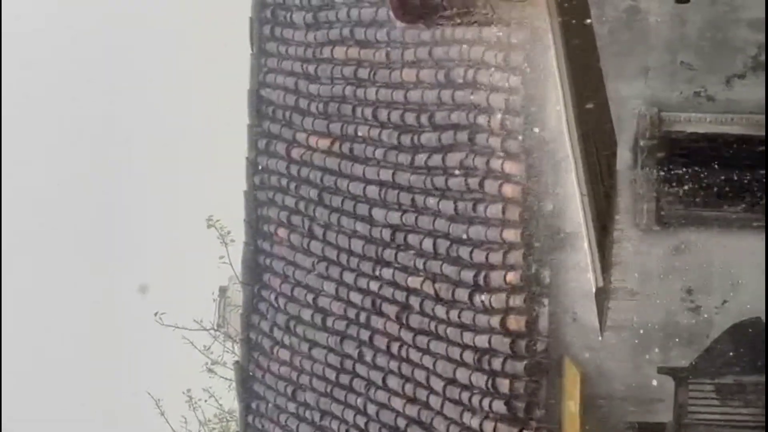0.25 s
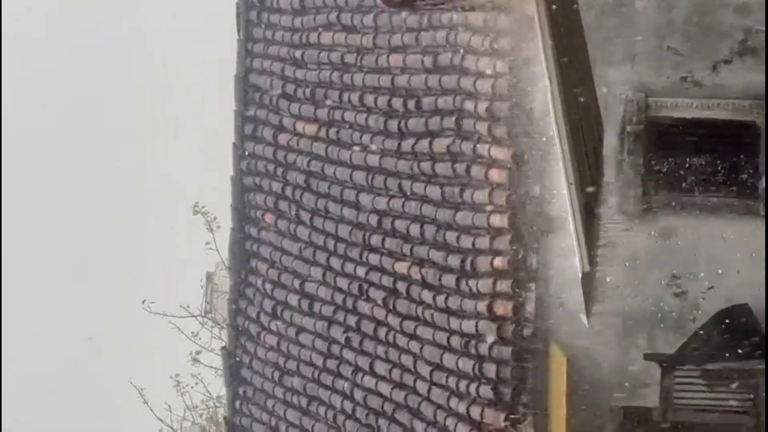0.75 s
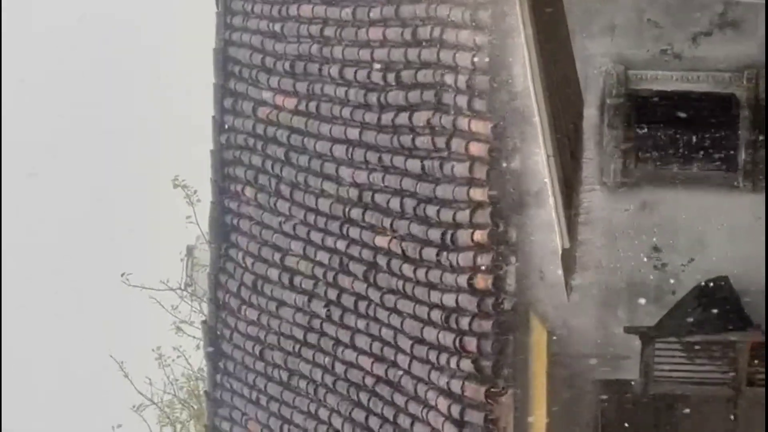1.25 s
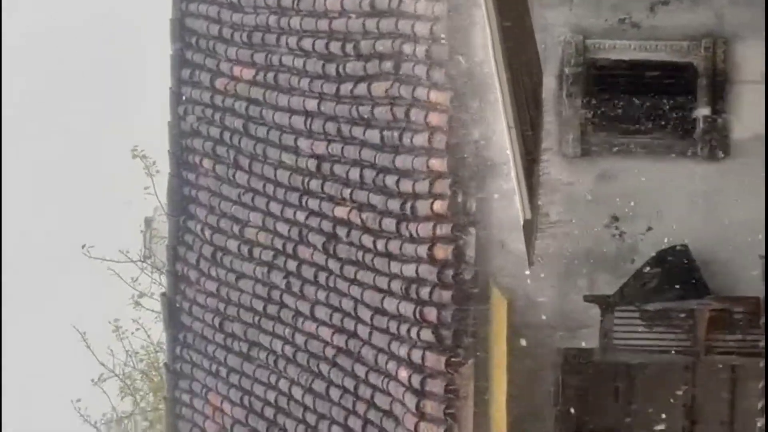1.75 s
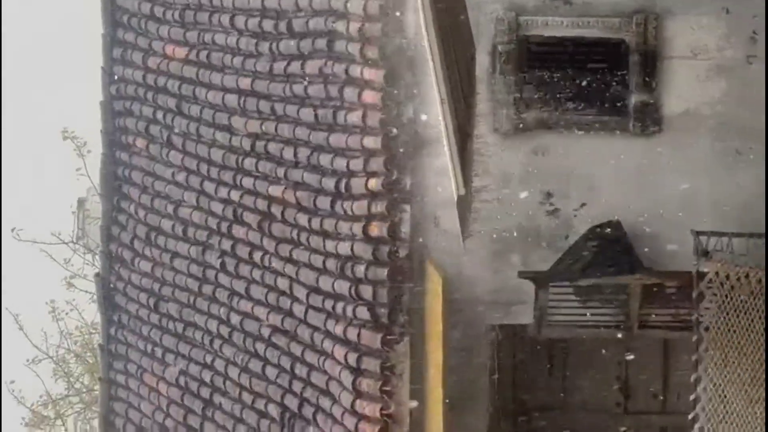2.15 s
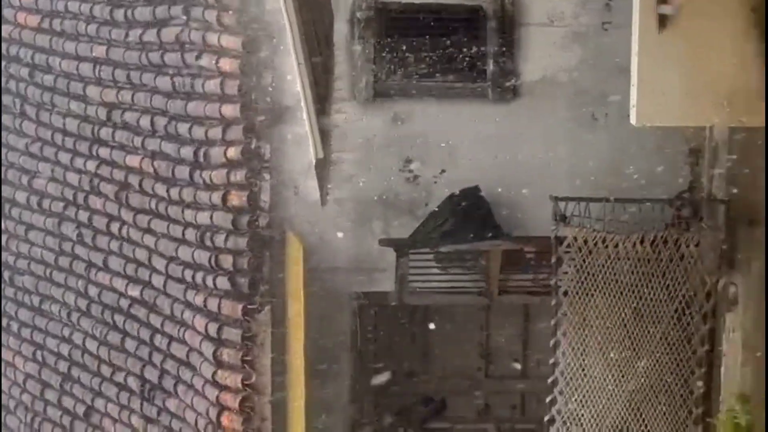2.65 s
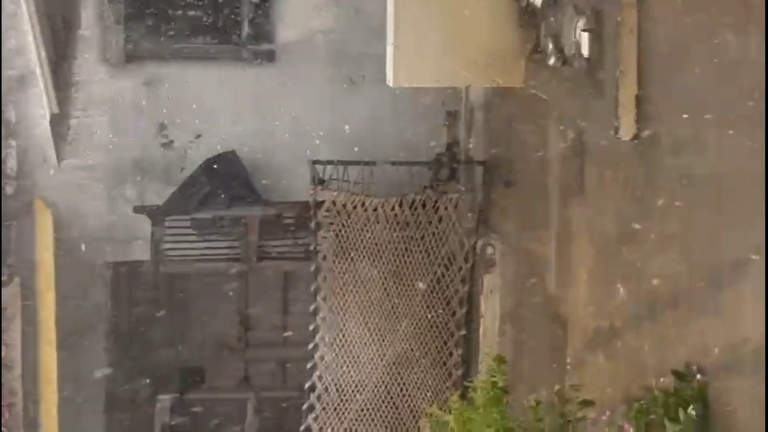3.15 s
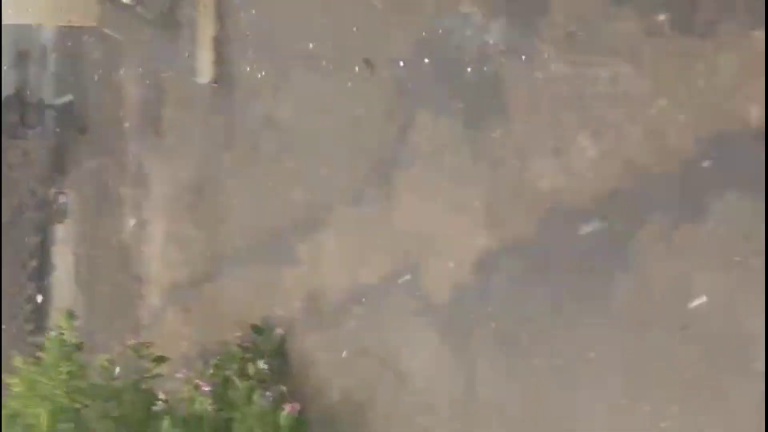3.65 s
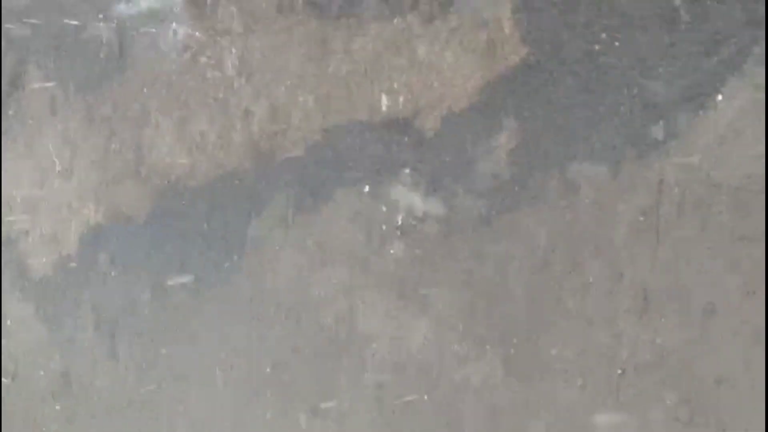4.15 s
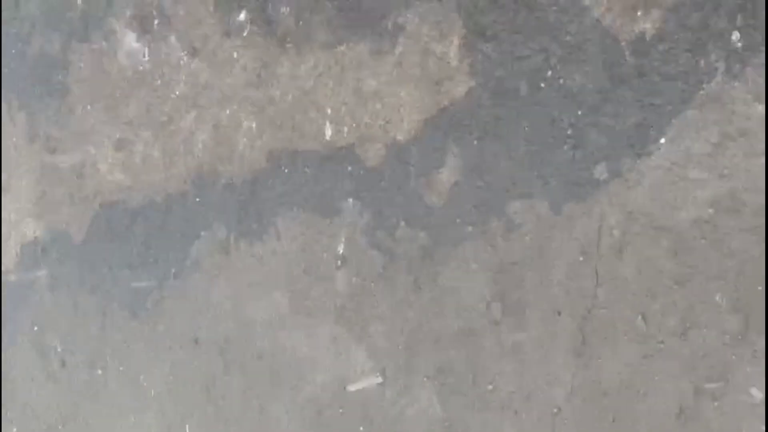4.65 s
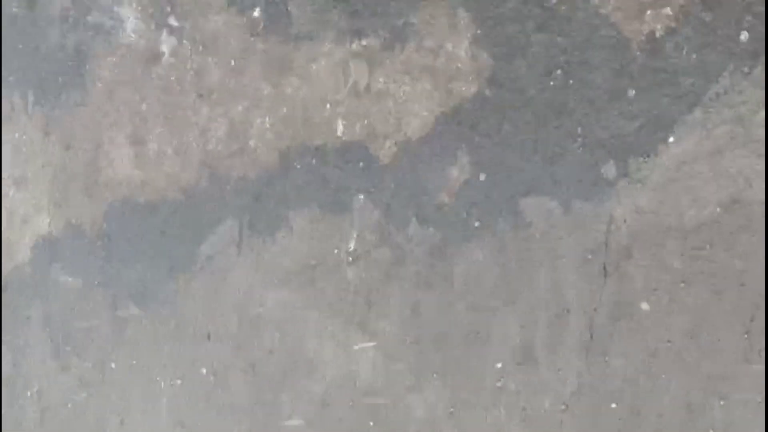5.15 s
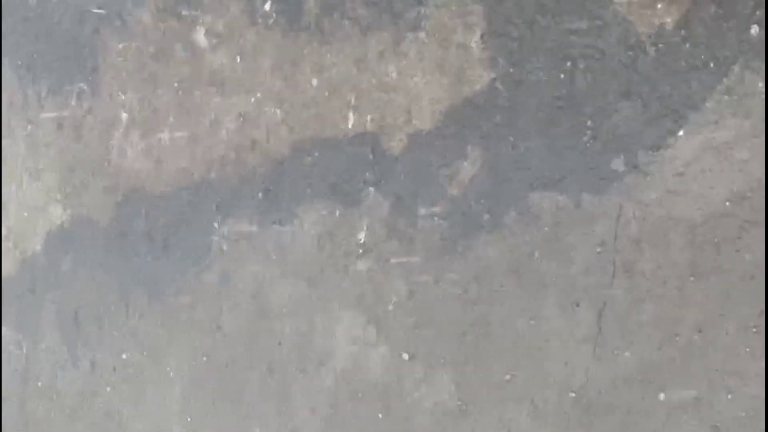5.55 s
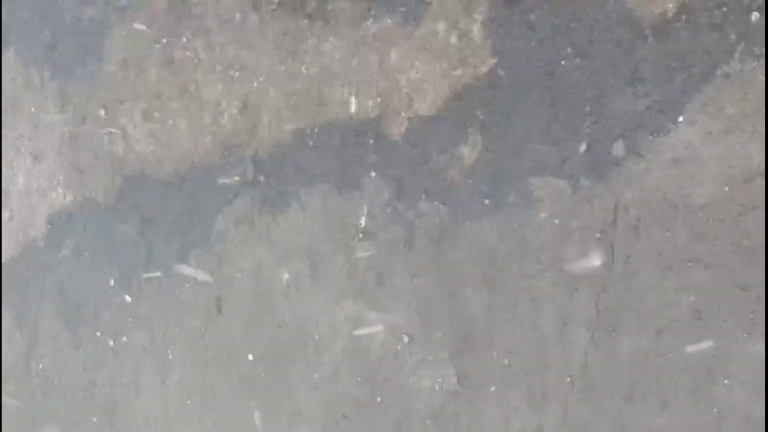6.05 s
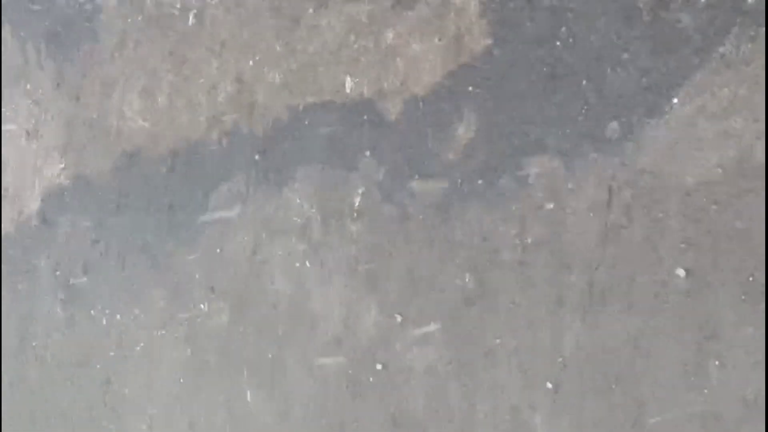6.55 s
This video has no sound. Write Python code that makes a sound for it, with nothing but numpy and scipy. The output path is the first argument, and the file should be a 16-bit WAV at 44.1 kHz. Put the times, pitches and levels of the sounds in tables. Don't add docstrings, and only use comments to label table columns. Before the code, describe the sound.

Heavy rain roars steadily on a tiled roof and paved yard, with sharp drop ticks, bright runoff splashes and dull thuds close by.

```python
import sys
import numpy as np
from scipy import signal
from scipy.fft import rfft, irfft, next_fast_len
from scipy.io import wavfile
from scipy.ndimage import uniform_filter1d, map_coordinates

SR = 44100
rng = np.random.default_rng(int(sys.argv[2]) if len(sys.argv) > 2 else 0)


def attenuation_scalar(level_db):
    decades = np.asarray(level_db, float) / 20
    return 10 ** decades


def store_wav(level_fs):
    pcm = np.round(np.clip(np.atleast_2d(level_fs), -1, 1) * 32767)
    wavfile.write(sys.argv[1], SR, pcm.T.astype(np.int16))


N = 299880


def unit(x):
    return x / np.sqrt(np.mean(x ** 2) + 1e-20)


def along(points, hz):
    f, v = np.transpose(points)
    return np.interp(np.log(hz + 1), np.log(f + 1), v)


def filtered(x, response):
    m = next_fast_len(x.shape[-1] + 2048)
    spectrum = rfft(x, m) * response(np.fft.rfftfreq(m, 1 / SR))
    return irfft(spectrum, m)[..., :x.shape[-1]]


def drops(count, hz, octaves, cycles, size_db):
    draw = rng.random((count, 2))
    pitch = np.clip(hz * 2 ** (octaves * rng.standard_normal((count, 1))), 150, 11000)
    size = attenuation_scalar(-size_db * np.log(draw[:, 1:] + 0.008))
    k = np.arange(128)
    turns = pitch * k / SR
    fade = np.exp(-turns / cycles) * np.cos(np.pi * k / 256)
    wave = size * np.sin(2 * np.pi * turns) * fade
    at = (draw[:, :1] * N).astype(int) + k
    return unit(np.bincount(at.ravel(), wave.ravel(), N + 128)[:N])


def yard(x, t60, wet):
    blocks = np.pad(x, (0, -N % 2048)).reshape(-1, 2048)
    t = np.arange(4097) / SR
    tails = rng.standard_normal((len(blocks), len(t))) * attenuation_scalar(-60 * t / t60)
    echo = signal.fftconvolve(blocks, tails / np.linalg.norm(tails[0]), axes=1)
    at = np.arange(len(blocks))[:, None] * 2048 + np.arange(echo.shape[1])
    return unit(x + wet * np.bincount(at.ravel(), echo.ravel())[:N])


def roar(spectrum, patchy_db, near):
    z = signal.stft(rng.standard_normal((2, N)), nperseg=256)[2]
    field = uniform_filter1d(rng.standard_normal(z.shape[1:]), size=9, axis=0)
    field = uniform_filter1d(field, size=14, axis=1)
    patchy = z * attenuation_scalar(patchy_db * unit(field))
    far = unit(signal.istft(patchy, nperseg=256)[1][:, :N])
    far[0] += near
    return unit(filtered(far, lambda hz: attenuation_scalar(along(spectrum, hz))))


def bursts(rows, rise, lump_s, lump_db, below_db, stops_db=0):
    out, t = np.zeros((2, N + SR)), np.arange(SR // 5) / SR
    pours_s, breaks_s = 0.027, 0.0044
    for s, db, hz, octaves, t60 in rows:
        noise = rng.standard_normal((2, len(t)))
        lumps = map_coordinates(rng.standard_normal(500), [np.minimum(t / lump_s, 490)])
        band = filtered(noise * attenuation_scalar(lump_db * lumps),
                        lambda f: np.exp(-.5 * (np.log2((f + 1) / hz) / octaves) ** 4))
        stop = stops_db * np.clip((t - pours_s) / breaks_s, 0, 1)
        decay = attenuation_scalar(-60 * (t / t60) ** 1.27 - stop) * (1 - t / t[-1])
        shape = (1 - np.exp(-t / rise)) * decay
        start = max(round((s - rise) * SR), 0)
        out[:, start:start + len(t)] += attenuation_scalar(db - below_db) * unit(band) * shape
    return out[:, :N]


# time in seconds, level in dB.
DOWNPOUR_STRENGTH = [(0.0, -24), (0.24, -25.5), (0.42, -25.5), (0.64, -26), (1.12, -26.5), (1.55, -27),
                     (1.86, -25), (2.01, -26.5), (2.67, -26), (2.86, -24.5), (3.6, -24.5), (3.81, -25.5),
                     (5.19, -23.5), (5.55, -23), (6.08, -24), (6.53, -23), (6.67, -23.5), (6.8, -25)]
# middle in seconds, change in dB, half length in seconds,
# surface it falls on (0 tiles, 1 paving, 2 air; values between or beyond reach them in part).
WIND_FLURRIES = [(0.024, 0, .05, 0), (0.218, 2.5, 0.026, 2.5), (0.553, -4, 0.081, 1), (1.01, 1, 0.22, 1),
                 (1.307, 5, 0.06, 1), (1.467, 0, .05, -1), (1.68, 1, 0.023, 0.7), (1.795, 6.5, 0.025, 3),
                 (1.957, 0, 0.053, 0), (2.171, 4.5, 0.025, 1.6), (2.27, 3, .05, 4), (2.365, 1, 0.021, 2),
                 (2.517, -2, 0.057, 0.8), (2.6, 5.5, 0.03, 1.3), (2.966, 0.5, 0.056, 3),
                 (3.215, 2, 0.014, -1), (3.404, 4.5, 0.018, 0.5), (3.54, 4.5, 0.051, 1),
                 (4.041, 7, 0.038, 1.3), (4.322, 1.5, 0.057, 1.2), (4.4, -3.5, 0.04, 1.5),
                 (4.852, 3, 0.12, 0.7), (5.195, 0.5, 0.078, 1), (5.235, 2.5, .03, 3), (6.166, -2, .03, -.5),
                 (1.45, 1.5, 0.028, 1.5), (1.62, 1, .03, -2), (2.16, 2, 0.023, -.5), (4.51, 2, .06, 0.5),
                 (5.11, -4, 0.13, -.5), (3.94, -2, .03, 0.5), (3.11, -1.5, .05, 0.6), (.82, -1.5, .03, 1.5),
                 (2.7, 2, .025, 0.5), (5.395, -0.5, 0.029, 0), (6.43, 1, .025, 0.5),
                 (6.585, -1.5, .015, 1.2), (.75, -1.5, .03, 3), (1.007, -1, .02, 2), (.67, -1, .02, 2),
                 (1.32, 2, 0.031, 1.5), (6.346, 2, .035, 2), (4.5, 1.5, .06, 2), (.6, -2, 0.069, 0),
                 (5.33, -1, 0.075, 0), (5.65, -1.5, .02, 1), (4.047, -4.5, 0.014, 3),
                 (1.277, 0.5, 0.023, 6), (5.57, 2, 0.029, -8), (5.734, 1.5, 0.036, 1),
                 (5.938, -2, 0.021, 2), (6.22, -1.5, 0.085, 0.64), (6.395, 7.5, 0.041, 3),
                 (6.51, 3, 0.071, 1), (6.608, 3.5, 0.019, 1.3)]
# level in dB at mean rain, change in dB per dB of rain.
LAYER_RESPONSE = [
    (-36.5, 1),
    (-33.5, 0.78),
    (-26, 0.91),
]
# frequency in Hz, level in dB.
TILE_TONE = [(18, -46), (30, -13), (112, 0), (232, -0.5), (581, 1), (750, -4.5), (980, -32), (1650, -120)]
# frequency in Hz, level in dB.
PAVING_TONE = [(410, -21), (700, -2), (914, -1), (2180, 2), (2500, -3.5), (3250, 0.5), (5500, -120)]
# frequency in Hz, level in dB.
SPRAY_TONE = [(1900, -35.5), (2400, -2), (3000, -2), (4200, 0), (5600, 0.5), (7600, 3), (8600, 2.5),
              (9400, 0), (10000, 0.5), (10700, -5.5), (11500, -16), (12100, -71)]


def downpour():
    t, surface = np.arange(N) / SR, np.arange(3)[:, None]
    strength = np.interp(t, *np.transpose(DOWNPOUR_STRENGTH))
    even_db, follows = np.transpose(LAYER_RESPONSE)[..., None]
    gusts_db = np.zeros((3, N))
    for s, db, half, on in WIND_FLURRIES:
        gusts_db += db * np.exp(-(surface - on) ** 2) * np.exp(-((t - s) / half) ** 2)
    knots = rng.standard_normal(200)
    gusts_db += 0.35 * map_coordinates(knots, [t * 9])
    gusts_db += 0.45 * map_coordinates(knots[::-1], [t * 18])
    tiles_gain, paving_gain, spray_gain = attenuation_scalar(even_db + follows * (strength - strength.mean()) + gusts_db)

    on_tiles = yard(drops(count=2500, hz=486, octaves=0.7, cycles=4.3, size_db=0.0), t60=0.41, wet=1.15)
    on_paving = yard(drops(count=4000, hz=1706, octaves=0.63, cycles=1.7, size_db=2.5), t60=0.24, wet=1.44)
    droplets = yard(drops(count=8000, hz=5000, octaves=0.7, cycles=1.23, size_db=2.5), t60=0.11, wet=1.0)
    tiles = roar(TILE_TONE, patchy_db=-1.36, near=0.19 * on_tiles)
    paving = roar(PAVING_TONE, patchy_db=0.7, near=0.32 * on_paving)
    spray = roar(SPRAY_TONE, patchy_db=1.5, near=0.62 * droplets)
    return tiles_gain * tiles + paving_gain * paving + spray_gain * spray


# time in seconds, peak in dB, pitch in Hz.
DOORSTEP_DROPS = [(1.539, -14, 6000), (0.5777, -16, 1700), (0.9845, -16, 4400), (1.0892, -20, 1980),
                  (1.1327, -7, 4700), (1.3803, -13, 1980), (1.4604, -20, 4200), (1.5225, -19, 1800),
                  (1.5911, -19, 1950), (1.6158, -18, 8000), (1.8522, -12, 3400), (1.9072, -7, 4050),
                  (1.9126, -13, 4800), (2.0054, -16, 4870), (2.2752, -9, 7500), (2.309, -5, 5200),
                  (2.5047, -20, 7400), (2.569, -18, 1400), (2.5954, -9, 4070), (2.606, -16, 3450),
                  (2.802, -13, 7800), (3.0066, -13, 4100), (3.2629, -14, 8300), (3.297, -18, 1620),
                  (3.3505, -14, 4400), (3.634, -19, 1190), (3.707, -22, 1140), (3.7361, -13, 5600),
                  (4.158, -18, 2620), (4.264, -9, 3700), (4.429, -23, 1400), (2.722, -11, 4000),
                  (4.5795, -15, 1800), (5.893, -14, 4000), (4.7008, -12, 2330), (4.7212, -10, 2460),
                  (4.7593, -10, 1800), (4.8744, -16, 3100), (4.9137, -14, 6100), (5.0197, -12, 2380),
                  (5.129, -19, 6400), (5.2078, -11, 7460), (5.392, -10, 7500), (5.4902, -6, 4300),
                  (5.4932, -17, 3800), (5.553, -21, 2600), (5.7788, -16, 2300), (5.8914, -11, 1460),
                  (5.9132, -16, 8200), (5.9615, -15, 1300), (5.9897, -7, 3900), (6.0027, -23, 1460),
                  (6.0178, -16, 1340), (6.1022, -10, 3800), (6.1237, -7.5, 4100), (6.3091, -11, 7800),
                  (6.3539, -8, 6400), (6.541, -20, 1480), (6.6056, -6.5, 4500), (6.612, -8.5, 5860)]


def doorstep():
    out, t = np.zeros((2, N + SR)), np.arange(SR // 100) / SR
    rise_cycles, frame_s, frame_db = 0.4, 0.0036, -12
    for s, db, hz in DOORSTEP_DROPS:
        age, start = hz * t / rise_cycles, s - rise_cycles / hz
        wave = np.cos(2 * np.pi * (hz * t - rise_cycles)) * rng.choice([-1, 1])
        click = attenuation_scalar(db) * wave * age * np.exp(1 - age)
        out[0, round(start * SR):][:len(t)] += click
        out[0, round((start + frame_s) * SR):][:len(t)] += attenuation_scalar(frame_db) * click
    small = drops(count=700, hz=1900, octaves=0.68, cycles=0.29, size_db=1.5)
    small = filtered(small, lambda f: f / (f + 300))
    out[0, :N] += attenuation_scalar(-45) * yard(small, t60=0.035, wet=0.74)
    return out[:, :N]


# time in seconds, peak in dB, pitch in Hz, width in octaves.
ROOF_LUMPS = [(.048, -16, 540, 0.35), (.19, -21, 477, 0.49), (1.266, -14, 563, 0.41),
              (1.32, -14, 466, 0.35), (1.39, -13.5, 435, 0.97), (2.2, -16, 440, 0.29),
              (2.565, -14.5, 395, 0.074), (1.66, -14.5, 505, 0.56), (1.81, -19, 810, 0.2),
              (5.7, -17, 626, 0.11), (3.36, -26, 540, 0.27), (3.43, -19.5, 560, 0.25), (4.38, -23, 420, .4),
              (4.47, -19, 540, .4), (2.3, -19, 330, 0.42), (2.977, -15.5, 660, 0.087),
              (3.481, -16.5, 284, 0.4), (3.561, -12.5, 355, 0.82), (4.084, -14, 504, 0.75),
              (4.287, -19, 595, 0.49), (4.897, -20, 613, 0.53), (5.061, -19, 528, 0.55),
              (5.131, -20, 624, 0.23), (5.626, -20, 598, 0.11), (5.873, -18, 554, 0.35),
              (6.51, -17, 377, 0.65), (6.6, -11.5, 171, 0.2)]


def roof_drum():
    rows = [(*row, 0.32) for row in ROOF_LUMPS]
    return bursts(rows, rise=0.00979, lump_s=0.013, lump_db=0, below_db=15)


# time in seconds, peak in dB, centre in Hz.
RUNOFF_SPLASHES = [(0.5385, -16, 8200), (0.9798, -26, 4430), (1.2342, -15, 3560), (1.2784, -22, 3200),
                   (1.536, -19.5, 8440), (1.6134, -16.5, 8080), (1.671, -17.5, 2860), (2.4984, -22.5, 7370),
                   (2.5916, -15.5, 4430), (2.9722, -19, 6660), (3.0024, -22, 2860), (3.2595, -14.5, 7400),
                   (3.3494, -18.5, 4290), (3.7264, -20.5, 3040), (4.0444, -11.5, 5960),
                   (4.2303, -14.5, 5900), (4.4466, -14, 8000), (4.7574, -14, 4530), (5.2084, -21, 5590),
                   (5.3914, -15, 3650), (5.4878, -16, 3700), (5.7257, -17, 4700), (5.826, -18, 6730),
                   (5.9247, -11.5, 6860), (5.9882, -22, 2940), (6.0195, -19, 7600), (6.4724, -15, 3200),
                   (6.5318, -18, 6700)]
# time in seconds, peak in dB, centre in Hz, width in octaves, time to die by 60 dB in seconds.
HEAVY_GUSHES = [(.179, -8, 4560, 0.14, 0.3), (0.184, -8.5, 5600, 0.8, 0.2), (1.13, -7.5, 5700, 0.6, 0.22),
                (1.236, -15.5, 2200, 1.2, 0.6), (1.743, -12, 7000, 0.69, 0.32),
                (1.78, -9.5, 7840, 0.34, 0.16), (1.903, -6.5, 5770, 0.87, 0.2),
                (2.168, -10, 6250, 0.68, 0.55), (2.2739, -7.5, 8100, 0.72, 0.15),
                (2.307, -3, 6000, 0.65, 0.28), (2.718, -9.5, 4160, 0.49, 0.12),
                (2.74, -16.5, 2630, 0.99, .25), (2.168, -15, 4400, 0.13, 0.36),
                (2.353, -16, 6960, 0.33, .2), (2.8, -9.5, 7730, 0.32, 0.11),
                (3.112, -11.5, 7440, 0.35, 0.076), (3.512, -9.5, 6300, .7, .3),
                (3.524, -4, 6400, 0.78, 0.14), (4.6832, -10.5, 6200, 0.78, 0.2),
                (4.852, -11.5, 7030, .5, 0.24), (5.575, -12.5, 4950, 0.59, 0.13),
                (5.669, -11, 5000, .6, .2), (6.306, -9.5, 7100, 0.6, 0.3), (6.348, -7, 6000, 0.79, 0.21),
                (6.377, -15, 4000, 0.78, 0.2), (6.605, -10, 3100, 0.42, 0.2),
                (6.605, -7.5, 5800, 0.33, 0.2)]


def runoff():
    rows = []
    for s, db, hz in RUNOFF_SPLASHES:
        t60 = 0.21 * 0.69 ** np.log2(hz / 5000)
        rows.append((s, db, hz, 0.41, t60))
    return bursts(rows + HEAVY_GUSHES, rise=.0016, lump_s=0.0019, lump_db=1.0, below_db=11.5, stops_db=2.5)


# time in seconds, peak in dB, pitch in Hz.
HEAVY_DROPS = [(.575, -12, 1640), (1.238, -9, 2290), (1.279, -19, 2080), (1.325, -17, 1400),
               (1.379, -15, 1960), (2.565, -14, 1520), (2.719, -10, 920), (2.749, -14, 2440),
               (2.799, -15, 1010), (3.294, -19, 1620), (3.386, -11, 1790), (3.48, -9, 2000),
               (3.529, -12, 860), (3.825, -11, 2310), (4.157, -9, 706), (4.447, -12, 1360),
               (4.7, -11, 1810), (4.758, -16, 1730), (5.017, -17, 1480), (5.35, -19, 1680),
               (5.552, -12.5, 1690), (5.676, -7.5, 2470), (5.892, -9.5, 1400), (5.96, -7.5, 1330),
               (6.016, -11, 1350), (6.374, -19.5, 2380), (6.471, -5, 1230), (6.491, -8, 1500),
               (6.713, -26, 1510), (6.764, -10.5, 2470)]


def thuds():
    rows = [(*row, 0.34, 0.12) for row in HEAVY_DROPS]
    return bursts(rows, rise=.004, lump_s=.004, lump_db=4.0, below_db=18.5)


# time in seconds, peak in dB, centre in Hz.
EAVES_SPATTER = [(1.127, -13, 5000), (1.24, -21, 1350), (1.256, -23, 2700), (1.28, -18, 4200),
                 (1.325, -23, 3300), (1.955, -18, 2660), (1.295, -19, 7150), (1.725, -15.5, 7640),
                 (1.788, -24, 950), (1.92, -24, 4870), (2.736, -28, 1350), (2.794, -16, 3700),
                 (3.275, -17.5, 2900), (3.37, -22, 1400), (3.47, -23, 950), (3.483, -23, 1900),
                 (3.575, -26, 1900), (3.583, -17.5, 5400), (3.748, -21, 955), (3.838, -20, 5400),
                 (4.02, -21.5, 3600), (4.25, -25, 940), (4.256, -15, 5200), (4.612, -27, 950),
                 (4.878, -15, 3800), (5.115, -19, 2700), (5.136, -20, 1350), (5.172, -15, 7600),
                 (5.422, -17, 3100), (5.558, -14, 5220), (5.592, -15, 5940), (5.62, -31, 670),
                 (5.675, -16, 3900), (5.725, -21, 4900), (5.722, -23, 1950), (5.777, -20, 3800),
                 (5.785, -24, 680), (5.826, -20, 2710), (5.905, -28, 500), (6.082, -15, 2300),
                 (6.325, -21, 3800), (6.54, -22, 690), (6.618, -22, 675)]


def eaves():
    rows = [(*row, 0.27, 0.12) for row in EAVES_SPATTER]
    return bursts(rows, rise=.003, lump_s=0.0044, lump_db=4, below_db=8.5, stops_db=2.5)


# time in seconds, peak in dB, pitch in Hz,
# time to die by 60 dB in seconds.
GUTTER_RINGS = [(1.905, -30, 2552, .3), (1.905, -29, 1900, .23), (1.905, -23, 4743, .2),
                (1.906, -25, 5329, .14), (1.906, -25, 6336, .14), (2.73, -33, 1077, 1.2),
                (2.79, -33, 1040, .6), (2.73, -34, 1513, .9), (2.724, -29, 2950, .55),
                (2.73, -26, 2363, .45), (2.735, -30, 1965, .4), (2.725, -29, 3510, .3),
                (2.79, -29, 4430, .3), (3.53, -35.5, 1077, 3.1), (5.672, -30, 2300, .55),
                (5.676, -22, 4070, .14), (5.672, -25, 5830, .25), (5.669, -24, 6500, .12),
                (6.372, -23, 2958, .28), (6.378, -25, 3515, .22), (6.376, -29, 2406, .2),
                (6.374, -22, 6950, .1), (6.606, -26, 2040, .35), (6.607, -25, 2584, .4),
                (6.608, -23, 2958, .4), (6.609, -29, 3540, .5), (6.62, -32, 1518, 1.5),
                (6.606, -23, 3145, .22), (6.606, -23, 5478, .28), (6.607, -23, 6115, .18),
                (6.607, -27, 7340, .2)]


def gutter():
    out, t = np.zeros((2, N + SR)), np.arange(SR // 2) / SR
    for s, db, hz, t60 in GUTTER_RINGS:
        waver_db = 1.5 * map_coordinates(rng.standard_normal(40), [t / .03])
        shape = attenuation_scalar(db + waver_db - 60 * t / t60) * (1 - np.exp(-t / 0.0028)) * (1 - t / t[-1])
        out[0, round(s * SR):][:len(t)] += shape * np.sin(2 * np.pi * hz * t)
    return out[:, :N]


# frequency in Hz, level in dB.
DOWNPIPE_TONE = [(40, -46), (75, -9), (115, 6), (170, -15), (260, -65)]
# time in seconds, level in dB.
DOWNPIPE_LEVEL = [
    (2.3, -69),
    (2.9, -46.5),
    (3.8, -45),
    (4.3, -50),
]


def downpipe():
    level_db = np.interp(np.arange(N) / SR, *np.transpose(DOWNPIPE_LEVEL))
    return attenuation_scalar(level_db) * roar(DOWNPIPE_TONE, patchy_db=2.0, near=0)


# frequency in Hz, level in dB.
LEFT_RIGHT_DIFFERENCE = [(60, -43), (200, -13), (480, -13.5), (700, .5), (900, 1), (1300, -13), (1900, -19),
                         (4000, -19.5), (7000, -12), (7800, -8.5), (9300, -7), (11000, -17)]


def scene():
    water = downpour() + doorstep() + roof_drum() + runoff() + thuds() + eaves() + gutter() + downpipe()
    ahead, apart = water
    apart = filtered(apart, lambda hz: attenuation_scalar(along(LEFT_RIGHT_DIFFERENCE, hz)))
    return np.array([ahead + apart, ahead - apart])


def resonance(f, hz, width_hz):
    return hz * hz / (hz * hz - f * f + 1j * f * width_hz)


# frequency in Hz, lag in radians.
LEFT_LAG = [(4600, 0), (4890, .6), (4930, 2.7), (5000, 3.7), (5030, 5.6), (5250, 6.28), (6500, 6.28),
            (7600, 6.9), (8700, 7.5), (9400, 7.9), (10000, 8.7), (10500, 9.2), (11500, 9.4)]


def left_phase(x):
    return filtered(x, lambda f: np.exp(-1j * along(LEFT_LAG, f)))


# frequency in Hz, dB against the loudness.
FAINTEST_MID = [(100, -26), (1000, -21), (3000, -18), (5500, -15), (7000, -11), (9000, -11.5), (9600, -10),
                (10000, -5), (10600, -8), (12000, -12)]
# frequency in Hz, dB against the loudness.
FAINTEST_SIDE = [(100, -17), (800, -21.5), (1500, -16.5), (2200, -17.5), (3000, -16), (4600, -11),
                 (5000, -3.5), (5400, -2), (7300, -6), (7700, -9), (9600, -6.5), (10400, -8.5),
                 (12000, -17.5)]
# frequency in Hz, share of the random scatter.
LIMIT_SCATTER = [(4000, .9), (7500, .9), (8500, .5), (9600, .7), (10500, 1.5), (11000, .8)]
# time in seconds, easing in dB per kHz above 8.5 kHz.
TREBLE_EASING = [(1.4, 2), (1.56, -1), (1.9, .5), (2.08, -1), (2.24, 1), (2.275, 9), (2.33, -2.5),
                 (2.65, 1), (2.98, -3), (3.52, 1), (3.85, -4), (4.05, 0), (4.25, -4), (4.66, 1.5),
                 (6.22, -1), (6.36, 3), (6.5, 0), (6.62, 3)]


def thinned(left, right):
    lead = 1024 - 486
    pair = np.pad([left + right, left - right], ((0, 0), (lead, 0))) / 2
    hz, s, z = signal.stft(pair, SR, "cosine", nperseg=2048)
    power = abs(z) ** 2
    loudness = uniform_filter1d(power[0, 80:400].mean(axis=0), size=3)
    scatter = 2.5 * rng.standard_normal((2, 65, z.shape[2])) + 1.5 * rng.standard_normal(z.shape[2])
    spread = along(LIMIT_SCATTER, hz)[:, None] * np.repeat(scatter, 16, axis=1)[:, :len(hz)]
    limit_db = np.array([along(FAINTEST_MID, hz), along(FAINTEST_SIDE, hz)])[..., None] + spread
    easing = np.interp(s - lead / SR, *np.transpose(TREBLE_EASING))
    limit_db -= np.clip(hz[:, None] / 1000 - 8.5, 0, 1.5) * easing
    narrow = uniform_filter1d(power, size=3, axis=1)
    wide = uniform_filter1d(power, size=13, axis=1)
    kept = np.array([narrow[0], wide[1]]) > loudness * attenuation_scalar(2 * limit_db)
    mid, side = signal.istft(z * kept, SR, "cosine", nperseg=2048)[1][:, lead:lead + N]
    return np.array([mid + side, mid - side])


def top_cut(x):
    return signal.sosfilt(signal.butter(12, 12000, fs=SR, output="sos"), x)


def record(dry):
    resonant = filtered(dry.mean(axis=0),
                    lambda f: attenuation_scalar(-13.0) * resonance(f, hz=825, width_hz=270) * f / (f + 220))
    mix = thinned(left_phase(dry[0] + resonant), dry[1] - resonant)
    return top_cut(mix)


dry = scene()
out = record(dry)
store_wav(out)
```